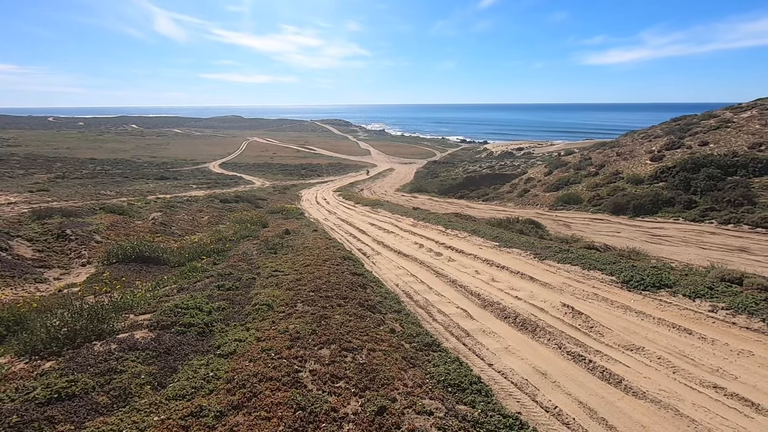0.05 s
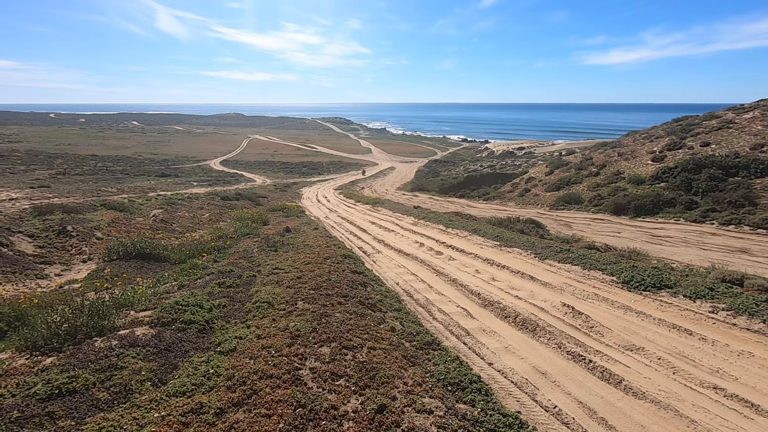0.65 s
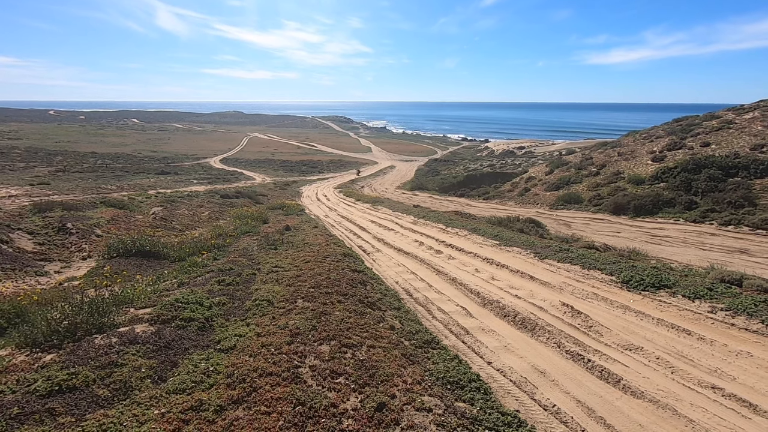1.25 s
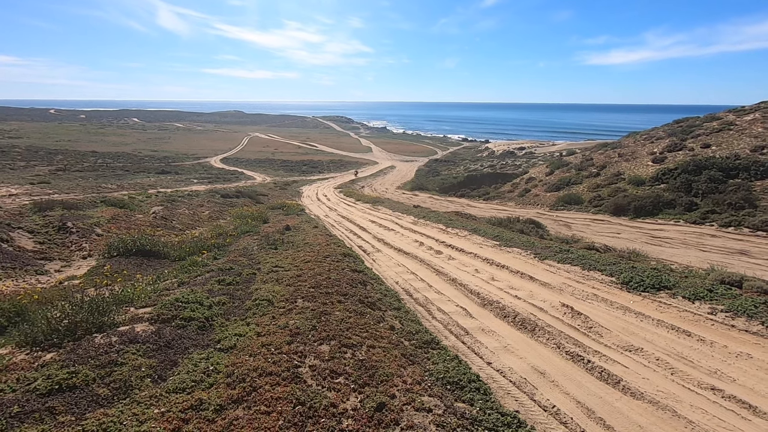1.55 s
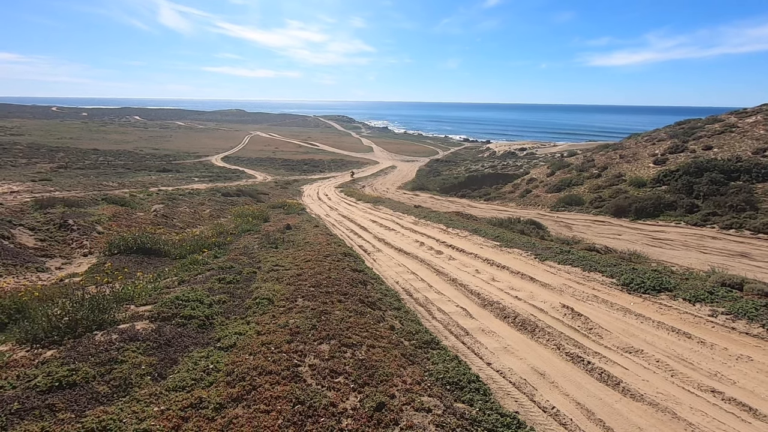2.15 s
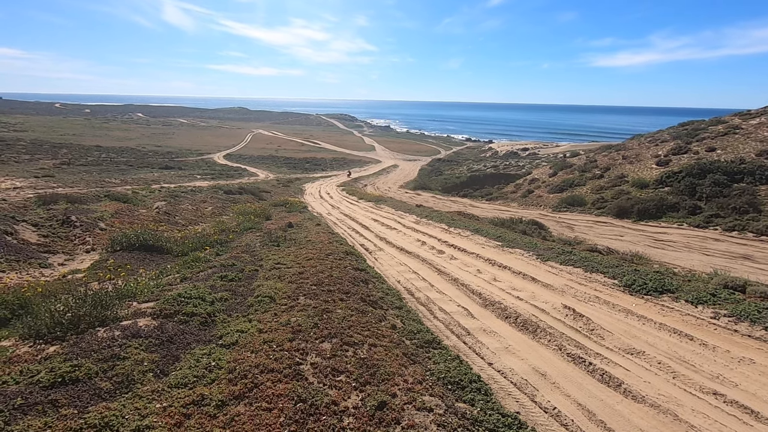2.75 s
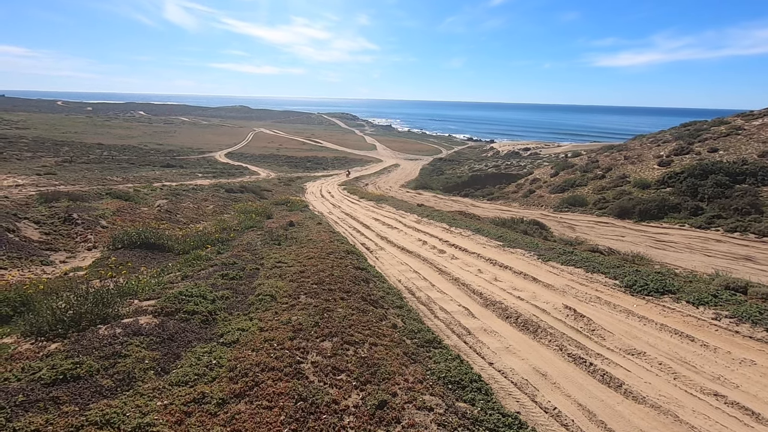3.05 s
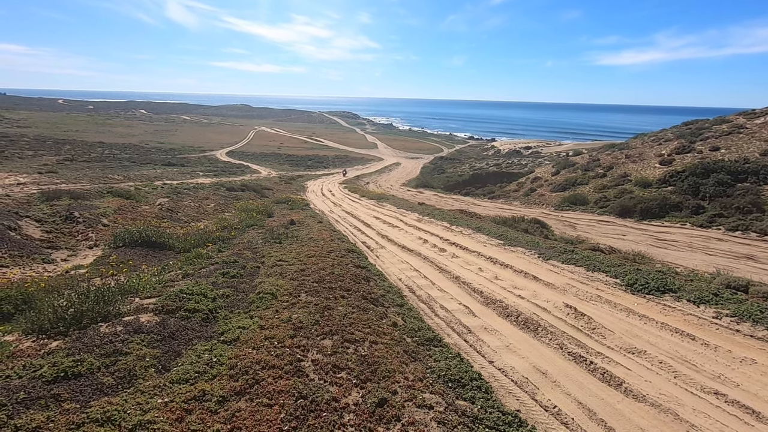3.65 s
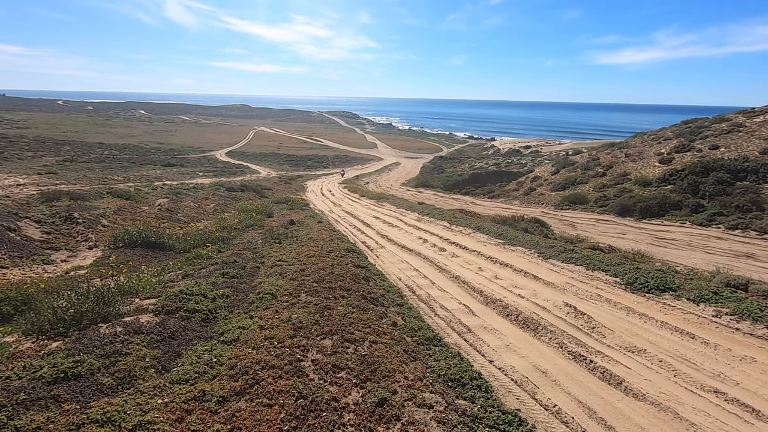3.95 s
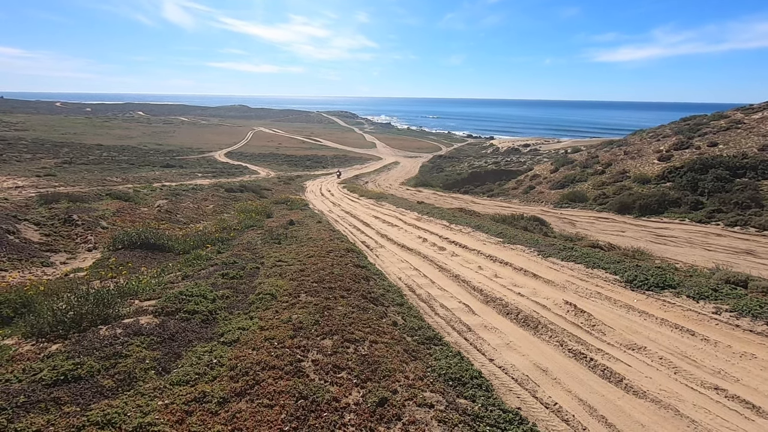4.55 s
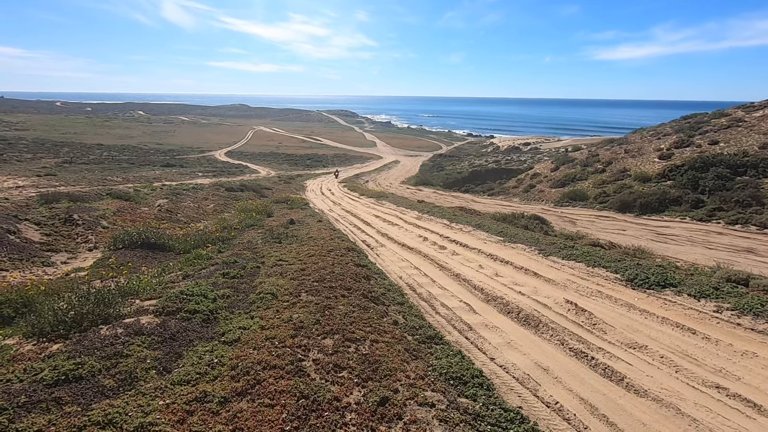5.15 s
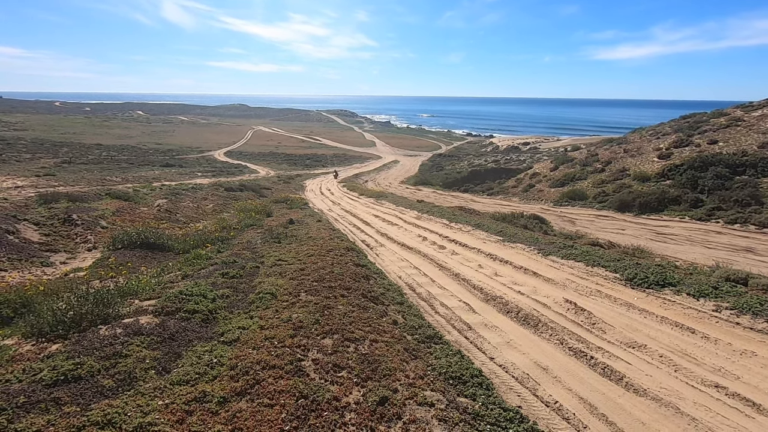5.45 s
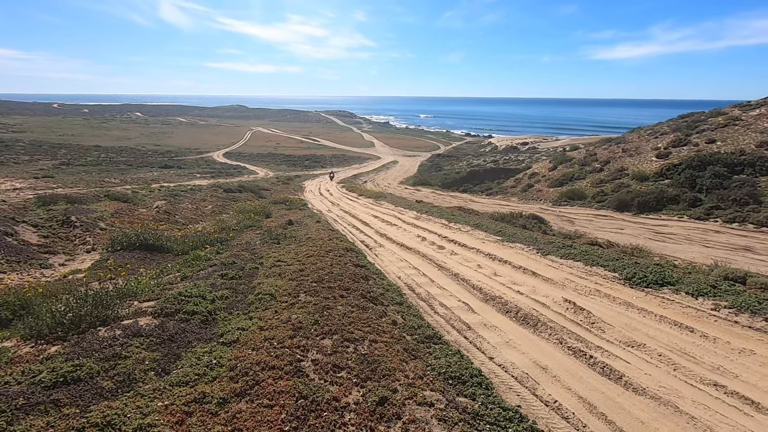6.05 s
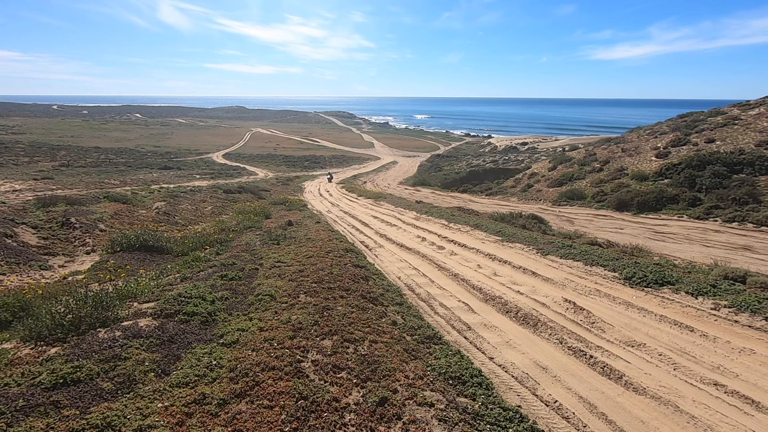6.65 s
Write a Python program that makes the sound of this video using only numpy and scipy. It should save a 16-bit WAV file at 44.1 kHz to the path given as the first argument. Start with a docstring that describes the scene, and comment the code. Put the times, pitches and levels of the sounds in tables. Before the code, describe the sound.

A distant motorcycle labours up a sandy track, revving up and down, while gusty wind rumbles on the microphone.

```python
"""A sandy coastal track: a V-twin motorcycle labours up it, far off and slowly coming closer.
Two uneven firings a cycle make the exhaust thud, bark and growl as the rider works the throttle,
and a thin gear whine joins as it nears. Behind it, distant surf roars and wind hisses in the scrub.
Gusts rumble, whistle and pop on the microphone's two ports, heaviest on the right,
until the wind drops and the image closes almost to mono."""
import sys
import numpy as np
from scipy import signal
from scipy.fft import rfft, irfft
from scipy.io import wavfile
from scipy.ndimage import uniform_filter1d, map_coordinates

SR = 44100
rng = np.random.default_rng(int(sys.argv[2]) if len(sys.argv) > 2 else 0)


def to_wav(sig):
    """Store sig (one row per channel, or 1-D mono) as 16-bit WAV at the path in sys.argv[1].

    Samples outside -1..1 are clipped; the rate is SR.
    """
    pcm = np.clip(np.atleast_2d(sig), -1, 1) * 32767
    pcm = np.round(pcm).astype(np.int16)
    wavfile.write(sys.argv[1], SR, pcm.T)  # frames by channels


N = 304290
TIME = np.arange(N) / SR
BINS = np.fft.rfftfreq(N, 1 / SR)

# engine speed, sagging in soft sand and picking up again: time_s, cycle_rate_hz
ENGINE_SPEED = [(0, 29.6), (0.37, 32), (0.6, 30.8), (1.36, 32.4), (1.52, 31.5), (1.82, 36.4), (2.26, 33.3),
                (2.52, 35.7), (2.95, 34), (3.55, 34.3), (4.12, 36.5), (4.46, 33.5), (4.63, 36.9),
                (4.9, 38.1), (5.15, 39.9), (5.37, 37.2), (5.53, 38.5), (5.87, 36.2), (6.03, 38.3),
                (6.14, 40.6), (6.29, 42.6), (6.42, 43.1), (6.53, 42.1), (6.64, 39.8), (6.9, 40.9)]
# the bike's climb: time_s, distance (0-1), thud_gain_db, upper_orders_boost_db
APPROACH = [(0, 0.76, -41, 0.5), (1.9, 0.95, -41, 0.5), (2.6, 0.76, -39.5, -0.5), (3.5, 0.88, -41, 0.5),
            (4.6, 0.64, -46.5, 0), (5.7, 0.37, -47.5, 2), (5.95, 0.1, -39.5, -6.5), (6.12, .07, -39, -5),
            (6.35, 0.09, -39, 2.2), (6.55, 0, -40, 1), (6.68, 0.01, -35, -1.5), (6.9, 0, -35.5, -4.5)]
# twists of the throttle: peak_s, length_s, bark_boost_db, rasp_boost_db, growl_boost_db
THROTTLE_TWISTS = [(0.3, 0.25, 0.5, -9, 5), (1.788, 0.83, 7.5, 2, 11), (2.708, 0.31, -0.5, -2.5, 9),
                   (4.062, 0.8, 4, -7.5, 2.5), (4.799, 0.46, 1, -5, 11), (6.01, .2, -1, -1.5, 5.5),
                   (6.34, 0.17, -2, 5.5, 16), (6.614, 0.12, -1.5, 0, 1), (6.896, 0.067, 3.5, 1, -11)]
# the thud's orders, one per multiple of the cycle rate from the first: gain_db
THUD_ORDERS = [-11, -5, -16, 1, -2.5, -7, -5.5, -18.5, -19.5, -21.5, -18.5, -30, -27.5, -26, -26.5, -28.5,
               -28]
# what the long path over the ground does to the thud: frequency_hz, gain_db
GROUND_EQ = [(60, -1.5), (100, -4.5), (135, 0.5), (152, -6), (175, -4.5), (220, -6), (255, -2.5),
             (280, 3.5), (315, 6), (350, -16.5), (450, -17.5)]
# tone of the exhaust bark, intake and clatter: frequency_hz, gain_db
BARK_EQ = [(200, 1.5), (420, 7.5), (520, -9.5), (650, 3), (850, 1), (1040, -6.5), (1230, -3), (1500, -20),
           (1800, -13.5), (2300, -21), (2850, -18.5), (5000, -26.5), (9000, -39), (11000, -48.5)]
# resonances of the exhaust pipe: pitch_hz, width_hz, gain_db
PIPE_RINGS = [(850, 180, 1.5), (1220, 180, -10)]
# gear whine coming and going: time_s, level_db
WHINE_FADER = [(4.6, -82), (4.95, -73), (5.12, -69.5), (5.37, -74), (5.6, -79.5), (5.85, -75), (6.2, -78),
               (6.6, -70), (6.9, -62)]
# how far the left port leads for sound from down the track: frequency_hz, lead_rad
LEFT_LEAD = [(200, 0.095), (520, 0.8), (860, 0.45), (1900, 0.19)]

# tone of the wind rumble: frequency_hz, gain_db
RUMBLE_EQ = [(8, -27), (22, -4.5), (40, 3.5), (75, 4.5), (125, -1.5), (180, -9.5), (260, -17.5), (380, -30),
             (550, -42.5), (900, -47.5), (2000, -87)]
# steady wind on the exposed right port, dropping near the end: time_s, level_db
STEADY_WIND = [(0, -36.5), (2.3, -32.5), (2.45, -37), (2.9, -37), (3.1, -35), (4.4, -27.5), (5.45, -28.5),
               (5.68, -34), (5.98, -35), (6.1, -43), (6.9, -61)]
# gusts fluttering on top of it: peak_s, length_s, left_db, right_db
WIND_GUSTS = [(0.057, 0.13, -38, -25.5), (0.242, 0.12, -41, -27), (0.437, 0.076, -42, -25),
              (0.752, 0.15, -54, -30.5), (1.02, 0.15, -49, -25), (1.23, 0.031, -34, -23.5),
              (1.41, 0.12, -41, -26.5), (1.647, 0.083, -37, -25), (1.747, 0.063, -40, -22),
              (2.052, 0.11, -37, -26), (2.152, 0.13, -33, -25), (2.29, 0.1, -29.5, -34.5),
              (2.478, 0.088, -48, -31.5), (2.636, 0.048, -35.5, -26.5), (2.85, 0.069, -41.5, -33),
              (3.012, 0.069, -59, -24.5), (3.235, 0.16, -35.5, -22.5), (3.398, 0.11, -41, -20.5),
              (3.605, 0.037, -50, -19), (3.683, 0.035, -22.5, -20.5), (3.787, 0.069, -26, -21),
              (3.917, 0.042, -52, -20.5), (3.988, 0.048, -33, -21.5), (4.125, 0.1, -42, -21),
              (4.221, 0.043, -41, -23.5), (4.49, 0.069, -30, -37), (4.637, 0.057, -45, -18),
              (4.777, 0.06, -34, -23.5), (4.94, 0.086, -24, -19), (5.011, 0.028, -29, -17),
              (5.173, 0.16, -31.5, -17), (5.325, 0.037, -30.5, -18), (5.395, 0.047, -29, -21.5),
              (5.496, 0.086, -30.5, -21), (5.982, 0.035, -40, -41), (6.474, 0.14, -41.5, -52),
              (6.834, 0.03, -40.5, -50)]
# eddies that pop on the microphone: time_s, peak_db, corner_hz, churn (0-1), suction (0-1)
EDDY_POPS = [ (0.459, -21.5, 149, 0.7, 0.45), (1.369, -35, 240, .4, 0.4), (1.762, -28, 146, 0, 0),
             (2.039, -21, 175, 0.6, 0.5), (2.155, -20, 151, 0.43, 0.1), (3.191, -21, 150, 0.57, 0.15),
             (3.409, -6.5, 132, 0, 0), (3.438, -3.5, 360, .2, .1), (3.599, -17.5, 140, 0.9, .5),
             (3.617, -26, 189, 0.7, 0.5), (3.683, -20, 140, .8, 0), (3.804, -17.5, 166, 0.7, 0.1),
             (3.926, -22, 190, 0.9, 0.1), (4.21, -21, 180, 1, 0.07), (4.872, -22, 188, 0.9, 0.05),
             (4.988, -10, 150, 0.7, 0), (5.078, -8, 195, 0.1, 0), (5.15, -11.5, 194, 0.2, 0),
             (5.213, -14, 140, 0.8, 0.1), (5.246, -9, 175, 0.9, 0.1), (5.321, -2.5, 330, .3, .9),
             (5.401, -9, 155, 0.8, 0.06), (5.449, -8.5, 188, 1, 0.6), (5.476, -13, 149, 0.6, 1),
             (5.522, -21, 140, 0.9, 0), (5.586, -11, 190, 1, 0.4), (5.598, -4, 240, 0.02, 0)]
# breathy notes blown at the ports: peak_s, length_s, pitch_hz, width_hz, left_db, right_db
WHISTLE_NOTES = [(0.099, 0.16, 5840, 200.8, -65, -77), (0.14, 0.37, 3710, 170, -61.5, -57.5),
                 (0.398, .8, 2074, 159, -65.5, -72), (0.487, .26, 6000, 280, -69, -72),
                 (.82, 0.26, 3720, 130, -72, -66.5), (1.051, 0.25, 5910, 150, -64, -75),
                 (1.3, .55, 2120, 80, -65.5, -83), (1.344, .18, 3620, 131, -76, -70),
                 (1.74, 0.37, 1183, 170, -60.5, -63.5), (1.758, .3, 3740, 130, -77, -72),
                 (2.153, 0.22, 5970, 161, -73, -75), (2.328, .2, 3680, 130, -75, -71.5),
                 (2.87, 0.25, 3770, 131.9, -79.5, -71), (3.685, 0.44, 2038, 239, -68, -74.5),
                 (3.7, 0.23, 3690, 260, -80.5, -73), (3.798, 0.23, 2810, 338, -75, -77),
                 (4.092, 0.16, 5830, 160, -72, -78), (4.601, .16, 3800, 129, -77, -71),
                 (4.87, 0.21, 3690, 130, -77, -69), (5.066, .16, 6000, 240, -69.5, -73),
                 (5.36, 0.13, 5820, 151, -77, -81), (5.65, .12, 5870, 140, -79, -76),
                 (6.136, 0.13, 3700, 140, -71, -79), (6.334, .1, 5830, 180, -74, -72)]
# wind in the scrub: time_s, gain_db, body_boost_db, top_boost_db
SCRUB_BREEZE = [(0.05, -51, -5.5, -5.5), (0.6, -58.5, 1.5, 2), (0.9, -62, 4.5, 4), (1.25, -68.5, 9, 5.5),
                (1.75, -67, 4.5, 7), (2.5, -71, 4.5, 4), (3.15, -70.5, -0.5, 3.5), (3.55, -63.5, -3.5, 2.5),
                (3.87, -63, 0, 2), (4.3, -72.5, 6, 8), (4.95, -63, -2.5, 2), (5.55, -75, 3, 9.5),
                (6.9, -79.5, 14, 11)]
# tone of that hiss at each port: frequency_hz, left_db, right_db
HISS_EQ = [(248, -9.5, -15.5), (524, -21.5, -14), (915, 1, 1), (1380, -7.5, -15), (2780, -11, -8),
           (3030, -13.5, -14.5), (5030, -18, -22), (5580, -18, -16.5), (6790, -34.5, -17),
           (7330, -30.5, -35), (9360, -45, -33), (10800, -49.5, -55.5)]
# port cavities ringing in the hiss: pitch_hz, width_hz, left_db, right_db
PORT_RINGS = [(1366, 20, -7.5, 19.5), (1836, 390, 6.5, 6), (2100, 77, 7, 2.5), (2257, 140, -8.5, -9),
              (3670, 520, 6, 11), (4330, 490, 4, 5), (5030, 130, 9, -5.5), (5884, 220, 16, 3),
              (6370, 150, -3.5, 4), (8670, 1200, 8.5, 14.5)]
# tone of the distant surf: frequency_hz, gain_db
SURF_EQ = [(30, 5), (150, 12.5), (300, 3.5), (520, -5.5), (800, 0.5), (1100, -13), (1500, -17), (3000, -30),
           (7000, -41), (11000, -58)]
# the stereo image closing: time_s, width (0-1)
STEREO_WIDTH = [(5.52, 0.96), (5.63, 0.66), (5.76, 0.2)]

SECOND_FIRING = 305 / 720  # share of a cycle after the first
AIR_WAVER = .006  # share of the pitch by which whistles and port rings waver


def motorcycle():
    """The crank speed wavers in the sand and drives both exhaust and gears."""
    cycles = np.cumsum(curve(ENGINE_SPEED) * (1 + .002 * drift(hz=14))) / SR
    return thud(cycles) + throttle(bark(cycles)) + growl(cycles) + whine(cycles)


def thud(cycles, trim_db=1):
    """The low orders of the exhaust add up to one beat a cycle; no two cycles burn equally hard."""
    rate_hz, far, upper_db = curve(ENGINE_SPEED), distance(), curve(APPROACH, column=3)
    orders = np.zeros(N)
    for k, db in enumerate(THUD_ORDERS, 1):
        gain = amp(db + upper_db * (k > 5)) * eq(GROUND_EQ, k * rate_hz) ** far * air_path()
        reflections = .55 * drift(hz=3)
        pipe_spread = .1 * (k - 5) ** 2
        jitter = (.012 + .036 * (1 - far)) * k * drift(hz=25)
        orders += gain * np.cos(2 * np.pi * k * cycles + reflections - pipe_spread + jitter)
    burn = 1 + .22 * drift(hz=35)
    return orders * burn * amp(curve(APPROACH, column=2) + trim_db)


def bark(cycles, crack_hz=1400, scatter_s=.018, puff_cycles=.37, crack_db=-5, puff_db=-4):
    """Each firing cracks out of the pipe, followed by a puff of rushing gas."""
    gas_flow = 1 + sum(np.exp(-((cycles - delay) % 1) / puff_cycles) for delay in (0, SECOND_FIRING))
    # the slopes scatter each crack over a few hundredths of a second
    lag = TIME[:SR // 10]
    echoes = rng.standard_normal(len(lag)) * np.exp(-lag / scatter_s)
    scatter = np.exp(1j * np.angle(rfft(echoes, N)))
    tone = eq(BARK_EQ, BINS)
    lows = 1 / np.sqrt(1 + (BINS / crack_hz) ** 6)
    cracks = turbulent(shaped(firings(cycles), tone * lows * scatter), depth_db=2.3, patch=(3, 16))
    gas = rng.standard_normal(N) * gas_flow
    puffs = turbulent(shaped(gas, tone * (1 - .5 * lows)), depth_db=2.2)
    return amp(crack_db) * cracks + amp(puff_db) * puffs


def throttle(exhaust, rasp_hz=2180):
    """Rides the bark's level; each twist of the throttle also changes its treble rasp."""
    rasp = irfft(rfft(exhaust) / (1 + (rasp_hz / (BINS + 1)) ** 6), N)
    return (exhaust + rasp * (amp(twist_db(column=3)) - 1)) * amp(bark_db())


def growl(cycles, against_bark_db=-15.5):
    """The firings ring the exhaust pipe, most under a hard throttle; distance blurs the ring."""
    pipe = sum(amp(db) / (1 + 2j * (BINS - hz) / width) ** 2 for hz, width, db in PIPE_RINGS)
    blur = .12 + .75 * distance()
    ring = np.sqrt(1 - blur) * shaped(firings(cycles), pipe) + np.sqrt(blur) * noise(abs(pipe))
    return ring * air_path() * amp(bark_db() + against_bark_db + twist_db(column=4))


def whine(cycles, teeth_per_cycle=44.3):
    """Meshing gears sing a thin tone that bends with the engine speed and throbs once a cycle."""
    mesh = np.sin(2 * np.pi * teeth_per_cycle * cycles + .6 * drift(hz=30))
    throb = 1 + .6 * np.cos(2 * np.pi * cycles) + .3 * drift(hz=30)
    return unit(mesh * throb) * amp(curve(WHINE_FADER))


def firings(cycles, unevenness=.14):
    """Two unevenly spaced clicks a cycle, each of slightly different strength."""
    clicks = np.zeros(N)
    for delay in (0, SECOND_FIRING):
        at = np.flatnonzero(np.diff(np.floor(cycles - delay)))
        clicks[at] += 1 + unevenness * rng.standard_normal(N)[at]
    return clicks


def bark_db(close_db=-46.5, far_loss_db=19):
    """The bark's fader: it comes up as the bike nears and moves with the throttle."""
    return close_db - far_loss_db * distance() + twist_db(column=2)


def twist_db(column):
    """One boost column of the throttle twists, played as smooth swells."""
    return sum(row[column] * swell(row[0], row[1]) for row in THROTTLE_TWISTS)


def distance():
    """How far off the bike is, from 1 at the foot of the track to 0."""
    return np.clip(curve(APPROACH), 0, 1)


def air_path():
    """Moving air makes a distant tone swell and fade."""
    return amp(2 * drift(hz=10))


def from_the_track(pair):
    """Distant sound reaches the right port a little after the left."""
    lag = np.exp(-1j * np.interp(BINS, *np.transpose(LEFT_LEAD)))
    return np.array([pair[0], irfft(rfft(pair[1]) * lag, N)])


def rumble(eddy_hz=160, brisk_db=-30):
    """Turbulence presses on each port; small eddies come in bursts and grow less than the gusts do."""
    small = 1 / (1 + (eddy_hz / (BINS + 1)) ** 4)
    ports = []
    for port in range(2):
        level_db, bursts = wind_db(port), drift(hz=22.3)
        air = rfft(noise(eq(RUMBLE_EQ, BINS)))
        eddies = irfft(air * small, N) * amp(2 * bursts - .02 * (level_db - brisk_db))
        flow = irfft(air * (1 - small), N) * amp(1.2 * bursts) + eddies
        levelled = flow / np.sqrt(uniform_filter1d(flow ** 2, size=3500) + 1e-9)
        ports.append(levelled * amp(level_db))
    return np.array(ports)


def wind_db(port, shelter_db=-5.5):
    """Gusts add their power to the steady wind, which is weaker on the sheltered left port."""
    power = amp(curve(STEADY_WIND) + (shelter_db, 0)[port]) ** 2
    for peak_s, length_s, *port_db in WIND_GUSTS:
        power += amp(port_db[port]) ** 2 * swell(peak_s, length_s)
    return 10 * np.log10(power)


def buffets(churn_s=.0075, suction_s=.0044, lee_hz=820, lee_phase_rad=2.8):
    """A strong eddy churns, slaps the ports and sucks back: a dull, hollow pop."""
    out, t = np.zeros((2, N)), TIME[:4096]
    hz = np.fft.rfftfreq(len(t), 1 / SR) + 1
    lead = len(t) // 4
    passing = np.exp(-((t - t[lead]) / churn_s) ** 2)
    # the left port gets the pop nearly inverted and thin in the bass
    lee = hz / np.hypot(hz, lee_hz) * np.exp(1j * lee_phase_rad)
    for time_s, peak_db, corner_hz, churn, suction in EDDY_POPS:
        swirl = rng.standard_normal(len(t)) * passing
        push = churn * swirl / np.linalg.norm(swirl)
        push[lead] += 1
        tone = 1 / (1 + (hz / corner_hz) ** 2)
        tone /= (1 + (80 / hz) ** 2) * (1 + (hz / (3 * corner_hz)) ** 6)  # trim the sub and the top
        right = rfft(push) * tone * (1 - suction * np.exp(-2j * np.pi * hz * suction_s))
        pop = np.array([irfft(right * lee), irfft(right)])
        start = round(time_s * SR) - lead
        out[:, start:start + len(t)] += amp(peak_db) * pop / abs(pop).max()
    return out


def whistles(rise_per_s=.06):
    """Passing gusts blow breathy notes at the ports; the pitch wavers and creeps up with the air speed."""
    out, air = np.zeros((2, N)), 1 + AIR_WAVER * drift(hz=7)
    for peak_s, length_s, pitch_hz, width_hz, *port_db in WHISTLE_NOTES:
        near = abs(TIME - peak_s) < 2 * length_s
        real, imag = rng.standard_normal((2, N))[:, near]
        breath = signal.lfilter(*signal.butter(2, width_hz / SR), real + 1j * imag)
        creep = rise_per_s * length_s * np.tanh((TIME[near] - peak_s) / length_s)
        bent_hz = pitch_hz * (air[near] + creep)
        note = (breath * np.exp(2j * np.pi * np.cumsum(bent_hz) / SR)).real
        out[:, near] += unit(note) * amp(port_db)[:, None] * swell(peak_s, length_s)[near]
    return out


def scrub(trim_db=3, body_hz=2500, top_hz=5000):
    """Wind combs through low bushes; the hiss sharpens, softens and rings the port cavities."""
    shared = rustle()
    body = 1 / (1 + (BINS / body_hz) ** 8)
    top = 1 / (1 + (top_hz / (BINS + 1)) ** 8)
    body_gain, top_gain = amp(curve(SCRUB_BREEZE, column=2)), amp(curve(SCRUB_BREEZE, column=3))
    bands = [(body, body_gain), (1 - body - top, 1), (top, top_gain)]
    ports = []
    for port in range(2):
        ring_db = sum(db[port] / (1 + (2 * (BINS - hz) / width) ** 2) for hz, width, *db in PORT_RINGS)
        tone = eq(HISS_EQ, BINS, column=port + 1) * amp(ring_db)
        hiss = rfft(shaped(shared + rustle(), tone))
        ports.append(sum(irfft(hiss * band, N) * gain for band, gain in bands))
    return wavering(ports) * amp(curve(SCRUB_BREEZE) + trim_db + .7 * drift(hz=7))


def rustle():
    """Leaf noise that swells and fades in patches as air moves through the bushes."""
    return turbulent(rng.standard_normal(N), depth_db=2.5, patch=(22, 36))


def wavering(pair):
    """The rings of both ports bend up and down together as the air speeds up and slows."""
    playhead = np.arange(N) + np.cumsum(AIR_WAVER * drift(hz=7))
    return np.array([map_coordinates(x, [playhead], order=3, mode="mirror") for x in pair])


def surf(level_db=-61):
    """The sea lays down a steady far roar, partly shared by both ports."""
    tone = eq(SURF_EQ, BINS)
    shared = turbulent(noise(tone), depth_db=2.2)
    return amp(level_db) * np.array([unit(shared + noise(tone)) for _ in range(2)])


def turbulent(x, depth_db, patch=(9, 22)):
    """Moving air makes patches of the spectrum (bins by frames) swell and fade."""
    spectra = signal.stft(x, nperseg=1024, noverlap=768)[2]
    patches = uniform_filter1d(rng.standard_normal(spectra.shape), patch[0], axis=0)
    patches = uniform_filter1d(patches, patch[1], axis=1)
    spectra *= amp(depth_db * unit(patches))
    return unit(signal.istft(spectra, nperseg=1024, noverlap=768)[1][:N])


def drift(hz):
    """Slow random wandering up to about the given rate."""
    coarse = TIME[::64]
    rates = np.fft.rfftfreq(len(coarse), coarse[1])
    spectrum = rfft(rng.standard_normal(len(coarse))) * np.exp(-(rates / hz) ** 2) * (rates > 0)
    return np.interp(TIME, coarse, unit(irfft(spectrum, len(coarse))))


def swell(peak_s, length_s):
    """A smooth rise and fall, length_s wide at half height."""
    return 0.5 ** ((2 * (TIME - peak_s) / length_s) ** 2)


def curve(rows, column=1):
    """One column of a time table as an automation curve."""
    rows = np.asarray(rows)
    return np.interp(TIME, rows[:, 0], rows[:, column])


def eq(rows, hz, column=1):
    """Gain of an EQ table at the given frequencies."""
    rows = np.asarray(rows)
    return amp(np.interp(np.log(hz + 1), np.log(rows[:, 0] + 1), rows[:, column]))


def noise(tone):
    """Noise with the given spectrum."""
    return shaped(rng.standard_normal(N), tone)


def shaped(x, tone):
    """Filters by a gain per frequency; rms 1."""
    return unit(irfft(rfft(x) * tone, N))


def amp(db):
    """Decibels to gain."""
    return 10 ** (np.asarray(db) / 20)


def unit(x):
    """Scales to rms 1."""
    return x / np.sqrt(np.mean(x ** 2) + 1e-20)


def scene():
    """Bike, sea and bushes in the distance; wind right at the microphone."""
    bike = motorcycle() * amp([[0], [.5]])  # a touch to the right
    return from_the_track(bike + surf()) + scrub() + whistles() + rumble() + buffets()


def record(dry, high_cut_hz=10600):
    """The image narrows onto the calmer left port, and a steep high cut takes off the top."""
    left, right = dry * signal.windows.tukey(N, .002)
    width = np.clip(curve(STEREO_WIDTH), 0, 1)
    narrowed = np.array([left, left + width * (right - left)])
    high_cut = signal.firwin(255, high_cut_hz, window=("kaiser", 8), fs=SR)
    return signal.oaconvolve(narrowed, high_cut[None], "same")


dry = scene()
out = record(dry)
to_wav(out)
```